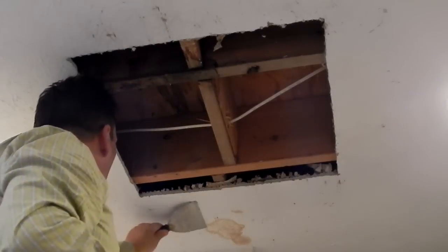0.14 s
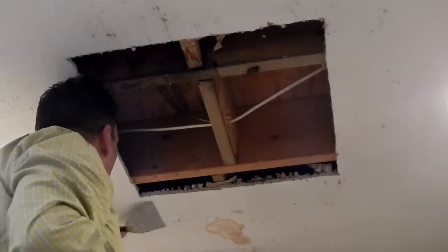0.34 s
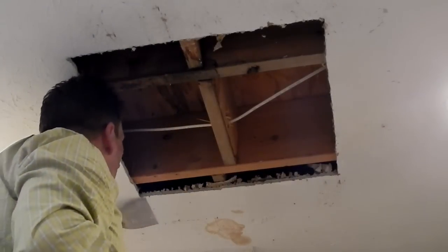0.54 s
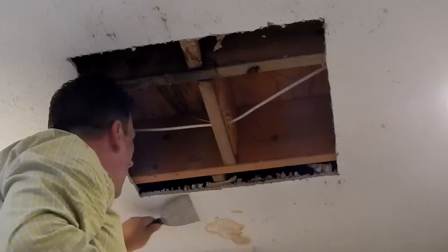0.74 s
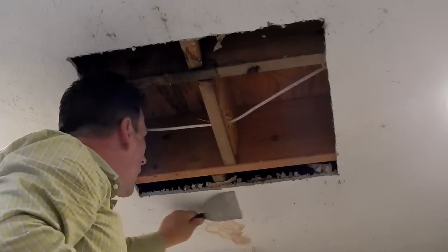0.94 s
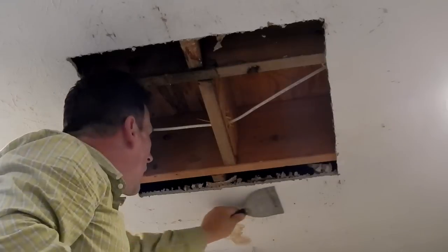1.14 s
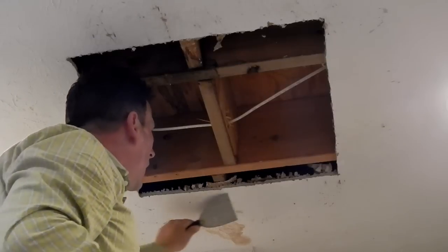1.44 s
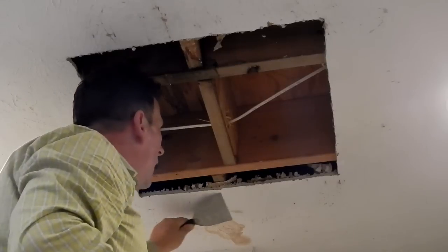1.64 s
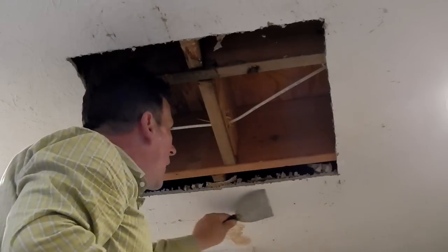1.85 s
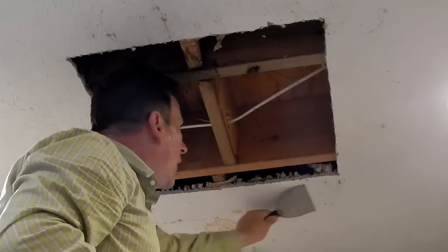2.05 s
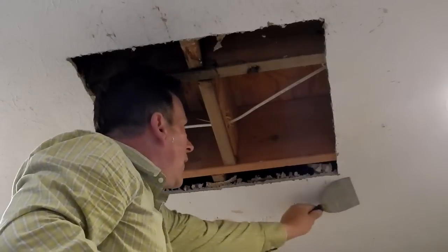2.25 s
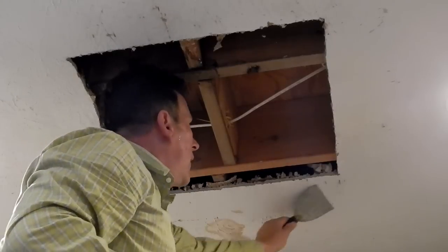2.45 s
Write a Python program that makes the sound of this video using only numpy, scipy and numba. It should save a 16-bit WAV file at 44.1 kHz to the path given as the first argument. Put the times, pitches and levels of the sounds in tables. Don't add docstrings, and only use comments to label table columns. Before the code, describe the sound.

A steel putty knife scrapes a drywall ceiling in a small reverberant room. A squeaky push runs 0-0.28 s, a softer pull 0.3-0.6, then a two-part push 0.62-1.35 with the sharpest snag and thump near 1.0. A strong gritty pull peaks at 1.5; a long chattering push fills 1.7-2.4, thumping near 1.97 and catching with squeals at 2.28. Another pull begins at 2.44 over faint rumble.

```python
import sys
import numpy as np
from scipy import signal
from scipy.fft import rfft, irfft
from scipy.io import wavfile
from scipy.ndimage import uniform_filter1d
from numba import njit

SR = 44100
rng = np.random.default_rng(int(sys.argv[2]) if len(sys.argv) > 2 else 0)


def boost_factor(decibels):
    exponent = np.asarray(decibels, float) / 20
    return 10 ** exponent


def to_wav(sig):
    pcm = np.clip(np.atleast_2d(sig), -1, 1) * 32767
    pcm = np.round(pcm).astype(np.int16)
    wavfile.write(sys.argv[1], SR, pcm.T)


N = 114660


def unit(x):
    return x / np.sqrt(np.mean(x ** 2))


def walk(rate_hz):
    k = int(SR / rate_hz)
    steps = np.repeat(rng.standard_normal(N // k + 1), k)
    return unit(uniform_filter1d(uniform_filter1d(steps, k), k)[:N])


def clicks(per_s, scatter_db):
    chance, size, sign = rng.random(N), rng.exponential(1, N), rng.choice([-1, 1], N)
    hit = np.clip((per_s / SR - chance) * SR / 20, 0, 1)
    return unit(hit * boost_factor(scatter_db * np.minimum(size, 5)) * sign)


def colour(x, points):
    p = np.array(points, float)
    log_hz = np.log(np.linspace(1, SR / 2, 2049))
    cepstrum = irfft(np.log(boost_factor(np.interp(log_hz, np.log(p[:, 0]), p[:, 1]))))
    cepstrum[1:2048] *= 2
    cepstrum[2049:] = 0
    h = irfft(np.exp(rfft(cepstrum)))
    return signal.fftconvolve(x, h / np.sqrt(np.sum(h ** 2)))[:N]


@njit
def svf(x, hz, width):
    y, b, l = np.empty(len(x)), 0., 0.
    for i in range(len(x)):
        g, k = np.tan(np.pi * hz[i] / SR), width / hz[i]
        v = (b + g * (x[i] - l)) / (1 + g * (g + k))
        b, l, y[i] = 2 * v - b, l + 2 * g * v, k * v
    return y


def ring(x, modes, wander):
    drift = 1 + wander * walk(6.3)
    out = np.zeros(N)
    for k, (hz, width_hz, db) in enumerate(modes):
        narrow = svf(x, hz * drift, 1. * width_hz)
        mode = svf(narrow, hz * drift, 3.55 * width_hz) / np.sqrt(width_hz / SR)
        out += (-1) ** k * boost_factor(db) * mode
    return out


def curve(axis):
    # time in s, hand speed as grit level in dB, pressure as chatter level in dB,
    # bending mode in Hz, tilt as upper-mode level in dB. One table a stroke.
    push_1 = [(0.0, -45.5, -34, 1580, -39.5), (0.11, -38.5, -35, 1850, -26.5),
              (0.166, -38.5, -37.5, 1690, -27), (0.27, -54.5, -41.5, 1660, -45.5),
              (0.28, -49, -47, 1650, -59)]
    pull_1 = [(0.3, -63, -47, 1650, -65), (0.306, -47.5, -51, 1670, -53), (0.344, -39, -36.5, 1590, -43),
              (0.456, -38.5, -35, 1670, -36), (0.59, -60, -50.5, 1460, -80)]
    push_2 = [(0.62, -53, -55, 1590, -76), (0.682, -44, -35.5, 1500, -74), (0.698, -46, -45.5, 1560, -41.5),
              (0.812, -37.5, -38, 1690, -39.5), (0.96, -39.5, -34, 1400, -29.5)]
    push_2b = [(1.04, -42, -36, 1520, -37), (1.094, -42.5, -37.5, 1570, -32.5),
               (1.174, -36.5, -41, 1780, -33.5), (1.27, -40.5, -34.5, 1680, -33.5),
               (1.318, -57, -51, 1776, -38), (1.351, -78, -60, 1800, -56)]
    pull_2 = [(1.37, -49, -59, 1680, -55), (1.388, -47.5, -62, 1610, -65), (1.433, -38, -30, 1390, -37),
              (1.5, -31, -30, 1610, -38), (1.612, -43, -36.5, 1410, -39), (1.67, -69, -45, 1420, -75)]
    push_3 = [(1.7, -61, -46, 1590, -68), (1.728, -47.5, -38, 1546, -37.5), (1.846, -38, -34.5, 1770, -33),
              (1.888, -38.5, -33, 1540, -28), (1.926, -40, -28, 1460, -32), (2.146, -42, -32, 1600, -27),
              (2.27, -39, -32, 1670, -25), (2.311, -44.5, -29, 1710, -24), (2.41, -78, -47, 1660, -62)]
    pull_3 = [(2.44, -45.5, -45, 1570, -62), (2.446, -57.5, -45, 1510, -48), (2.503, -37.5, -29, 1440, -43),
              (2.6, -39.5, -35.5, 1640, -54)]
    rows = np.array([*push_1, *pull_1, *push_2, *push_2b, *pull_2, *push_3, *pull_3], float)
    return np.interp(np.arange(N) / SR + 0.012, rows[:, 0], rows[:, axis])


def house():
    # frequency in Hz, level in dB.
    spectrum = [(20, -33), (38, -4.5), (52, -8), (70, -9.5), (97, -5.5), (200, -10.5), (2000, -32.5),
                (15000, -39)]
    return boost_factor(-46.5) * colour(rng.standard_normal(N), spectrum)


def swell(at_s, db, length_s):
    t = np.arange(N) / SR
    return boost_factor(db) * np.exp(-((t - at_s) / length_s) ** 2 * 2)


def panel():
    # frequency in Hz, width in Hz, level in dB.
    low_modes = [(36.6, 20, -30), (71.5, 21, -13), (105, 33, -18), (150, 35, -3.5), (218, 26, -6),
                 (285, 53, -7.5)]
    high_modes = [(343.4, 17.6, -5), (420, 50, -6), (568, 77, -9), (679, 77, -5.5), (870, 176, -6.5)]
    # time in s, level in dB, push length in s.
    lumps = [(0.206, -49, 0.06), (0.395, -38, 0.06), (0.684, -42, 0.1), (0.76, -33.5, 0.042),
             (0.856, -30.5, 0.034), (0.986, -45, 0.06), (1.488, -34, 0.06), (1.606, -43, 0.035),
             (1.791, -39, 0.09), (1.86, -35.5, 0.024), (1.946, -31, 0.031), (2.08, -44, 0.011),
             (2.29, -45, 0.054), (2.512, -41, 0.1)]
    # time in s, level in dB, length in s, mode in Hz.
    shoves = [(.01, -35, 0.026, 278), (.045, -32, 0.011, 150), (0.163, -35, 0.047, 285),
              (0.105, -45, 0.07, 70.5), (0.115, -33, 0.048, 148.7), (0.248, -42, 0.048, 71.6),
              (0.266, -41.5, 0.026, 135.7), (0.704, -37, .04, 70), (0.693, -33, 0.023, 270),
              (0.723, -32.5, 0.042, 142), (0.752, -41, 0.033, 664), (0.779, -27.5, 0.019, 146),
              (0.779, -34, 0.036, 288), (0.842, -33.5, 0.024, 142), (0.86, -34, 0.033, 350),
              (0.88, -30.5, 0.022, 170.4), (0.95, -29, 0.013, 164.4), (0.993, -27, 0.008, 420),
              (1.004, -23.5, 0.018, 154.7), (1.01, -25, 0.021, 279.5), (1.03, -38, .06, 37.8),
              (1.041, -28.5, 0.015, 138.8), (1.146, -36.5, 0.03, 142.7), (1.218, -34.5, 0.012, 300.6),
              (1.236, -28, 0.021, 160), (1.47, -35, 0.032, 362.4), (1.497, -39, .05, 139.8),
              (1.495, -28.5, .03, 426.4), (1.522, -35, 0.03, 402.8), (1.63, -34, 0.032, 143),
              (1.807, -28.5, 0.061, 144.5), (1.877, -25, 0.014, 142), (1.882, -40, 0.11, 40),
              (1.971, -21, 0.041, 147.2), (1.97, -32.5, 0.064, 65.4), (2.035, -34, 0.045, 290),
              (2.097, -27.5, 0.014, 303), (2.15, -37, .05, 69.3), (2.232, -38, 0.02, 285),
              (2.314, -28, 0.066, 140), (2.316, -37, 0.068, 69), (2.517, -31, 0.059, 147)]
    rub_db, rub_follows = -25, 0.62
    rub = boost_factor(rub_follows * curve(axis=2) + rub_db + 0.75 * walk(24.7))
    crush = sum(swell(*row) for row in lumps)
    high = (rub * boost_factor(2.5) + crush) * rng.standard_normal(N)
    clock_s = np.cumsum(1 + 0.03 * walk(30)) / SR
    thumps = np.zeros(N)
    for at_s, db, length_s, hz in shoves:
        thumps += swell(at_s, db, length_s) * np.sin(2 * np.pi * hz * clock_s)
    thumps *= boost_factor(1.2 * walk(39.96))
    hum = ring(rub * rng.standard_normal(N), low_modes, 0.018)
    return hum + ring(high, high_modes, 0.0086) * boost_factor(-9.5) + thumps


def snags():
    # start in s, level in dB, decay in s.
    spots = [
        (.044, -38.5, 0.0044),
        (.133, -32.5, .004),
        (1.423, -43, .004),
        (1.492, -42, 0.0048),
        (2.035, -46, 0.0035),
        (2.093, -48, 0.0047),
        (2.133, -34.5, .004),
        (2.282, -26.5, 0.0069),
        (2.491, -35.5, 0.011),
    ]
    # frequency in Hz, level in dB.
    spectrum = [(60, -16), (300, 3.5), (1000, -4.5), (3500, 0), (5000, -6.5), (9000, -17), (15000, -25)]
    hold_s, catch_db = 0.008, 20
    t = np.arange(N) / SR
    env, catch = np.zeros(N), np.zeros(N)
    for at_s, db, decay_s in [*spots, (.9783, -20.5, .007)]:
        env += boost_factor(db) * (t >= at_s) * np.exp(-np.maximum(t - at_s - hold_s, 0) / decay_s)
        catch[int(at_s * SR)] = boost_factor(db + catch_db)
    return colour(catch + env * clicks(5000, 2.4), spectrum)


def grit():
    # frequency in Hz, level in dB.
    spectrum = [(100, -28.5), (600, 0.5), (2000, 6.5), (4000, -1), (6000, -4.5), (10000, -2), (12500, -7),
                (15500, -19.5)]
    level_db, flicker_db = 5, 0.79
    speed = boost_factor(curve(axis=1) + level_db + flicker_db * walk(30.2))
    return speed * colour(clicks(per_s=7500, scatter_db=3.5), spectrum)


def squeals():
    # start in s, length in s, level in dB, first pitch in Hz, last pitch in Hz.
    bites = [(0.019, 0.037, -32, 1529, 1556), (0.076, 0.036, -27, 2010, 1983),
             (0.084, .025, -25.5, 1796, 1785), (0.117, 0.023, -30, 1830, 1776),
             (0.137, 0.042, -29, 1760, 1607), (0.189, 0.032, -33.5, 1714, 1704),
             (0.389, 0.044, -32, 1690, 1730), (0.419, .04, -37, 1800, 1710),
             (0.789, 0.081, -37, 1832, 1930), (1.024, 0.067, -36, 1480, 1600),
             (1.15, 0.041, -32.5, 1935, 1950), (1.157, 0.073, -34.5, 1750, 1784),
             (1.214, 0.053, -31, 1928, 1863), (1.462, 0.058, -28.5, 1720, 1690),
             (1.86, 0.062, -34, 1580, 1544), (1.976, 0.047, -33, 1576, 1570),
             (2.055, 0.057, -29, 1574, 1500), (2.105, 0.108, -30.5, 1555, 1585),
             (0.984, .12, -41.5, 4880, 4800), (2.192, 0.046, -37, 2760, 2960),
             (1.917, 0.053, -48, 1560, 1560), (2.222, .05, -40, 1570, 1573), (2.261, .07, -36, 2750, 2720),
             (2.277, 0.023, -25, 1730, 1745), (2.278, 0.042, -35.5, 3650, 3675),
             (2.287, 0.043, -26, 1560, 1603), (2.352, 0.042, -33.5, 1610, 1620),
             (2.408, .025, -52, 1575, 1610)]
    width_hz, edge_s, sing_share = 125, .012, 0.55
    t, out = np.arange(N) / SR, np.zeros(N)
    stutter = boost_factor(2.2 * walk(110))
    waver = 1 + .03 * walk(90)
    slips = clicks(1582, 0.86) + .5 * rng.standard_normal(N)
    for at_s, length_s, db, first_hz, last_hz in bites:
        end_s = at_s + length_s
        bite = stutter * np.clip(np.minimum(t - at_s, end_s - t) / edge_s + .5, 0, 1)
        hz = np.interp(t, [at_s, end_s], [first_hz, last_hz])
        narrow = svf(bite * slips, hz, 1. * width_hz)
        rung = svf(narrow, hz, 2. * width_hz) / np.sqrt(width_hz / SR) / 2
        locked = bite * np.sin(2 * np.pi * np.cumsum(hz * waver) / SR)
        out += boost_factor(db) * (rung + sing_share * locked)
    return out


def blade():
    # frequency in Hz, width in Hz, level in dB.
    body_modes = [(795, 630, -9), (1069, 57, -5.5), (1467, 280, -8), (2440, 1800, -19)]
    upper_modes = [(2640, 220, -4.5), (3096, 320, -4.5), (3060, 480, -4.5), (3667, 700, -1),
                   (4300, 2200, -7), (4864, 320, -9.5)]
    bend_width_hz, bend_wander, chatter_db, upper_db = 490, 0.022, -4.5, -9.5
    slips = clicks(per_s=700, scatter_db=2) + 0.85 * rng.standard_normal(N)
    slips = boost_factor(2.6 * walk(49.78)) * slips
    pressed = slips * boost_factor(curve(axis=2) + chatter_db)
    tilted = slips * boost_factor(curve(axis=4) + upper_db)
    bend_hz = curve(axis=3) * (1 + bend_wander * walk(26.6))
    bend = svf(pressed, bend_hz, 1. * bend_width_hz) / np.sqrt(bend_width_hz / SR) / 2.47
    return bend + boost_factor(-5) * ring(pressed, body_modes, .04) + ring(tilted, upper_modes, .006) / 1.5


def high_pass(x, hz, order=2):
    return signal.lfilter(*signal.butter(order, hz, "high", fs=SR), x)


def room(x):
    t60_s, gap_s, wet_db, side_db = 0.31, .002, 2, 2.5
    step, tail_len = 1024, 8192
    t = np.arange(tail_len) / SR
    fade = boost_factor(-60 * t / t60_s) * (t > gap_s)
    fade = fade / np.sqrt(np.sum(fade ** 2))
    window = np.sqrt(signal.windows.hann(2 * step, sym=False))
    padded, out = np.pad(x, (step, 2 * step)), np.zeros((2, N + 2 * tail_len))
    for i in range(0, N + step, step):
        tail = rng.standard_normal((2, tail_len)) * fade
        piece = padded[i:i + 2 * step] * window
        out[:, i:i + 2 * step + tail_len - 1] += signal.fftconvolve(piece[None], tail, axes=1)
    mid, side = out[:, step:step + N]
    mid = high_pass(mid, 267)
    side = boost_factor(side_db) * high_pass(high_pass(side, 210), 2220, order=1) + boost_factor(-21.5) * side
    side = signal.lfilter(*signal.butter(1, 12100, fs=SR), side)
    wet = mid + np.array([[1], [-1]]) * side
    return (x + boost_factor(wet_db) * wet) / np.sqrt(1 + boost_factor(2 * wet_db))


def scene():
    left_db = 0.6 - 0.21 * np.arange(N) / SR
    dry = house() + panel() + snags() + grit() + squeals() + blade()
    return room(dry) * boost_factor(np.array([left_db, -left_db]))


def top_cut(x):
    return signal.sosfilt(signal.butter(12, 15690, fs=SR, output="sos"), x)


def record(dry):
    width_hz, depth = 70, .85
    for hz in (2500, 5000, 7500, 10000):
        dry = dry - depth * signal.lfilter(*signal.iirpeak(hz, hz / width_hz, fs=SR), dry)
    return top_cut(dry)


dry = scene()
out = record(dry)
to_wav(out)
```